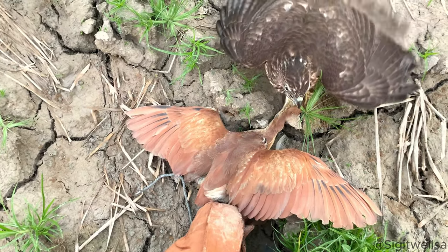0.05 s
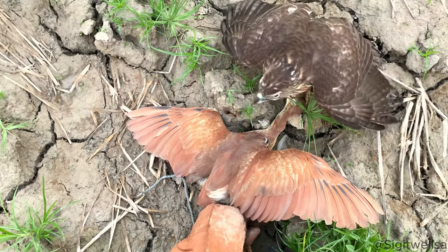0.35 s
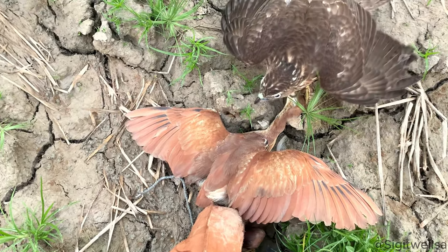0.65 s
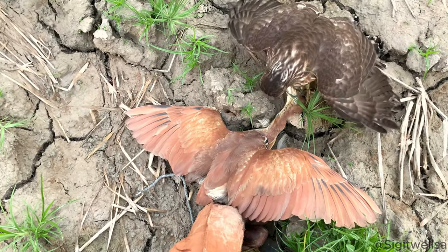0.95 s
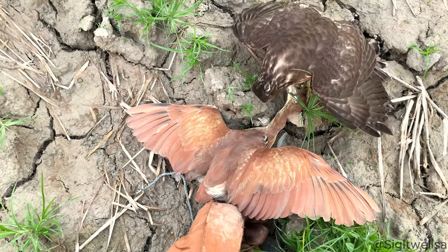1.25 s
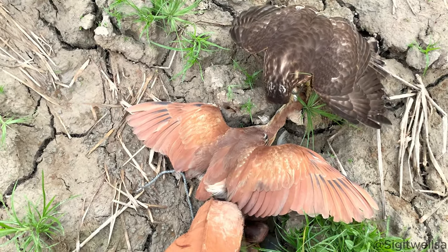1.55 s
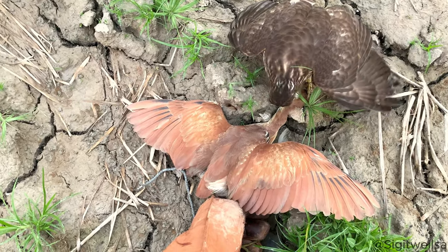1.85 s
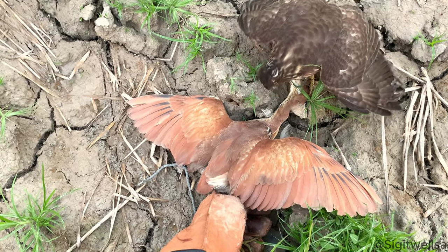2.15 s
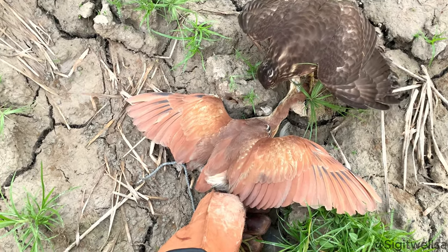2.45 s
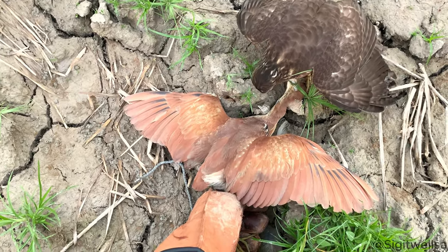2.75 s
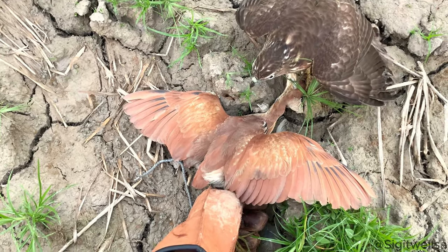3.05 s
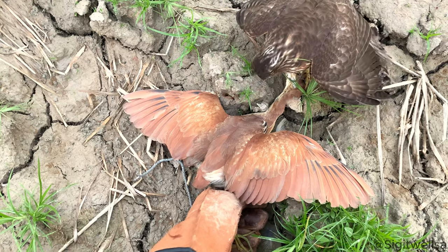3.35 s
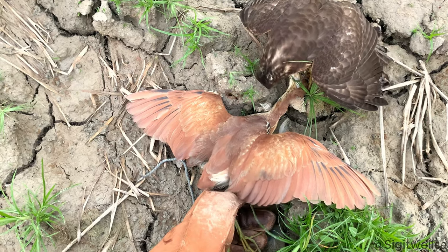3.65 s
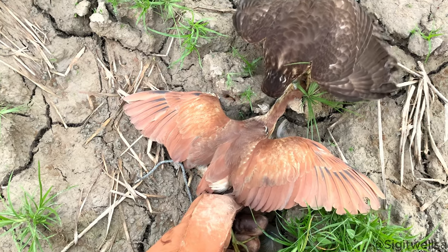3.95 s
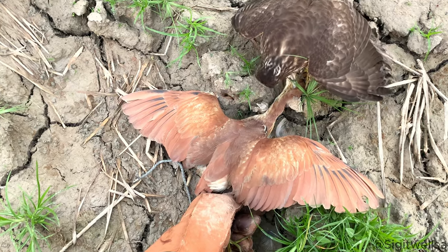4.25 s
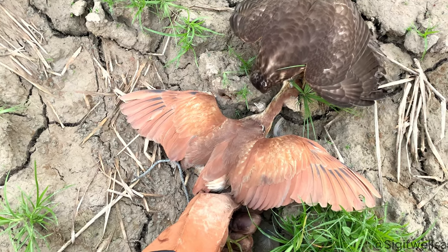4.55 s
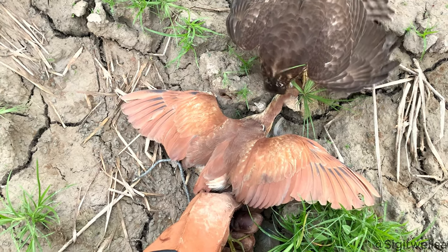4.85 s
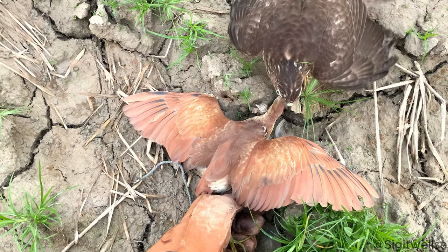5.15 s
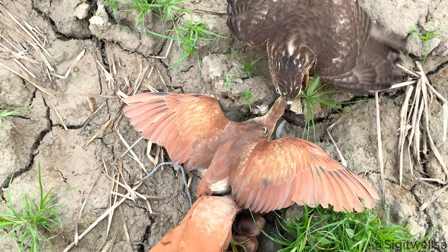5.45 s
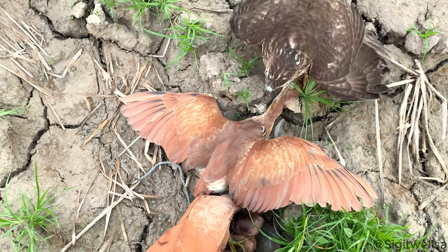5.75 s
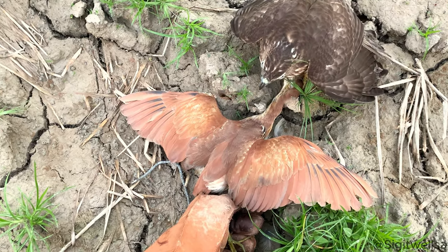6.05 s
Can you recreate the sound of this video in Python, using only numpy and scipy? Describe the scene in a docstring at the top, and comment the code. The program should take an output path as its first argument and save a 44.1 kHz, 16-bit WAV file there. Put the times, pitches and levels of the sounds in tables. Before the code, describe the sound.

A small heron gives five harsh, hoarse, high squawks at close range over a low outdoor rumble.

```python
"""Low outdoor rumble, hiss and the camera's own faint buzz, on dry open ground. Almost at once a small
heron, pinned by a hawk close to the camera's microphone, gives the first of five squawks.
Its syrinx sings a high arched tone, hoarse with turbulent air, that drops away as the tension goes;
in three of the squawks the voice breaks into a rasp. Dry straw snaps now and then, and in the second
half come faint far chips, perhaps of an insect."""
import sys
import numpy as np
from scipy import signal
from scipy.fft import rfft, irfft, next_fast_len
from scipy.io import wavfile

SR = 44100
rng = np.random.default_rng(int(sys.argv[2]) if len(sys.argv) > 2 else 0)


def log_audio(samples):
    """Write samples as a 16-bit WAV file to the path given in sys.argv[1]."""
    # one column per channel
    frames = np.atleast_2d(samples).T
    # limit to full scale, then quantise
    limited = np.clip(frames, -1, 1)
    pcm = np.round(limited * 32767).astype(np.int16)
    wavfile.write(sys.argv[1], SR, pcm)


N = 272979
TIME = np.arange(N) / SR
BAND_LIMIT_HZ = 15750

# rumble of the open ground: f/Hz, relative level/dB
RUMBLE_SPECTRUM = [(12, -49), (20, -16), (40, -6), (65, -1.5), (118, -3.5), (183, -13), (239, -22.5),
                   (340, -17), (460, -33.5), (526, -34), (761, -39), (1100, -42.5), (1430, -63.5),
                   (2420, -120)]
# likeness of the rumble on left and right: f/Hz, correlation (-1 to 1)
RUMBLE_LIKENESS = [(30, .98), (130, .98), (230, .75), (380, .1), (600, -.5), (1100, -.6)]
# steady hiss: f/Hz, relative level/dB
HISS_SPECTRUM = [(300, -26.5), (1100, -4.5), (2500, 0), (4700, 0), (7000, 1), (7900, 13), (8700, -3),
                 (10000, -3), (12000, 3), (13400, 3), (15800, -15)]
# resonances of the lens motor: f/Hz, width/Hz, relative level/dB
MOTOR_MODES = [(1431.4, 120, 5), (1675, 170, 3)]
# what the camera housing passes: f/Hz, relative level/dB
HOUSING_SPECTRUM = [(900, -20), (1250, 0), (1850, 0), (2200, -20)]
# the heron's calls: t/s, length/s, crest f/Hz, held f/Hz (both at full tension), settles after/s,
# level/dB, overtone fade/(dB/s), then as offsets: fundamental/dB, its change once settled/dB,
# octave/dB, high overtones/dB, hoarseness/dB; last, beak resonance start f/Hz, end f/Hz
SQUAWK_CALLS = [(0.203, 0.307, 1700, 1471, 0.076, -21.5, -30, -0.5, -17, 1.5, 6, -3.5, 5300, 3400),
                (1.089, 0.292, 1616, 1550, 0.090, -26.5, 0, -4.5, 3, -1.5, 2.5, -5, 5400, 3650),
                (3.524, 0.312, 1566, 1534, 0.097, -27.5, -5, -2, 0, -4, 5, -2, 5200, 3600),
                (4.387, 0.292, 1620, 1547, 0.079, -26.5, -5, -3, 1, -5.5, 2.5, -5.5, 5300, 3500),
                (5.982, 0.308, 1646, 1449, 0.079, -19, -50, -8, -15, -3, 5, -7, 4850, 3850)]
# fixed resonances of the windpipe: f/Hz, half-width/Hz, boost/dB
WINDPIPE_MODES = [(3240, 100, 8), (6250, 170, 5.5)]
# colour of the fourth partial and above: f/Hz, relative level/dB
OVERTONE_SPECTRUM = [(4000, 13), (5200, -4), (6300, -7.5), (7900, -4.5), (9300, -10.5), (11000, -12),
                     (12600, -3), (14200, -13), (16000, -22)]
# last squeak of the third partial as a squawk dies: t/s, level/dB, half-length/s
END_SQUEAKS = [(0.497, -20, .008), (1.366, -17.5, .009), (3.813, -23.5, .011), (4.661, -23, .008)]
# turbulent air through throat and beak: f/Hz, relative level/dB
BREATH_SPECTRUM = [(300, -32.5), (650, -31), (1050, -41.5), (1550, -1.5), (1950, -21), (2650, -23),
                   (3100, 6.5), (3700, 3), (4700, 11.5), (5400, 3), (7300, 1.5), (8800, -1), (11300, 0.5),
                   (13500, -3.5), (15800, -13.5)]
# breaks in the voice: start t/s, end t/s, level/dB, throat resonance start f/Hz, end f/Hz, pitch jump/Hz
VOICE_BREAKS = [(0.319, 0.357, -28, 3250, 3177, 1.5), (0.372, 0.378, -17.5, 3200, 3177, 44),
                (.383, 0.449, -16.5, 3426, 3146, 148.5), (0.449, .486, -23, 3200, 3000, -2),
                (3.634, 3.640, -22, 3550, 3490, 75), (3.67, 3.678, -27, 3567, 3434, 44.5),
                (3.717, 3.772, -21, 3750, 3700, 89), (4.565, 4.608, -19, 3800, 3793, 72.5)]
# spitting noise in a rasp: f/Hz, relative level/dB
SPIT_SPECTRUM = [(300, -27), (650, -18), (1050, -24.5), (1700, 4.5), (2300, 7.5), (4500, -3.5),
                 (6500, -12.5), (15000, -23.5)]
# decay of the echoes from ground and plants: f/Hz, time to fall 60 dB/s
ECHO_DECAY = [(500, .5), (3000, .2), (5000, .22), (8000, .45), (14000, .7)]
# small snaps of dry straw: t/s, peak level/dB
STRAW_SNAPS = [(0.5746, -44), (3.353, -47), (3.3864, -52), (3.8832, -44.5), (3.9418, -45), (3.956, -45.5)]
# resonances of a dry stalk: f/Hz, half-width/Hz, relative level/dB
STALK_MODES = [(2955, 520, 2.5), (3790, 2400, -7), (5330, 330, -28)]
# chips in the distance: t/s, peak level/dB, f/Hz
FAR_CHIPS = [(4.766, -66.5, 7300), (4.781, -64, 5870), (4.914, -60.5, 5860), (4.941, -65.5, 7400),
             (5.018, -68, 5900), (5.17, -65.5, 7350), (5.59, -58, 7430), (5.852, -66, 7400)]
# the recorder's stereo processing: f/Hz, phase lead of the left channel over the right/rad
STEREO_PHASE = [(0, 0), (1550, 0.8), (2100, -0.13), (2800, 4.33), (3300, 0.64), (3750, 1.14), (4400, 2.64),
                (4800, 3.2), (5600, 4.58), (6700, 6.21), (8850, 9.42), (11000, 12.53), (13200, 15.72),
                (15000, 18.84)]


def amp(db):
    """Decibels to gain."""
    return 10 ** (np.asarray(db) / 20)


def unit(x):
    """Scales to rms 1."""
    return x / np.sqrt(np.mean(x ** 2) + 1e-20)


def read(points, hz):
    """Reads a table on a log-frequency axis."""
    f, value = np.transpose(points)
    return np.interp(np.log(hz + 1), np.log(f + 1), value)


def add(mix, s, sound):
    """Mixes a sound in at time s."""
    part = mix[max(round(s * SR), 0):][:len(sound)]
    part += sound[:len(part)]


def colour(x, points):
    """Filters by a spectrum table; rms 1."""
    return unit(irfft(rfft(x) * amp(read(points, np.fft.rfftfreq(len(x), 1 / SR))), len(x)))


def wobble(size, hz):
    """Up to a second of random motion, rolling off above hz; rms about 1."""
    f = np.fft.rfftfreq(SR, 1 / SR)
    return unit(irfft(rfft(rng.standard_normal(SR)) / (1 + (f / hz) ** 4), SR))[:size]


def resonate(x, hz, width):
    """A resonance of gain 1 at its centre."""
    turn = np.exp(2j * np.pi * np.cumsum(np.full(len(x), hz)) / SR)
    pole = np.exp(-np.pi * width / SR)
    return 2 * (turn * signal.lfilter([1 - pole], [1, -pole], x / turn + 1e-18)).real


def ring(x, modes):
    """Resonances side by side, each applied twice for a narrower, steeper peak."""
    return sum(amp(db) * resonate(resonate(x, hz, width), hz, width) for hz, width, db in modes)


def bell(hz, centre_hz, half_width):
    """A resonance curve: 1 at its centre, 0.5 at one half-width off."""
    return 1 / (1 + ((hz - centre_hz) / half_width) ** 2)


def gate(t, start, end, edge=.0015):
    """1 between start and end, with short ramps."""
    return np.clip((t - start) / edge + .5, 0, 1) * np.clip((end - t) / edge + .5, 0, 1)


def outdoor_rumble(mid_db=-57.5, gust_db=.5):
    """Low rumble that swells a little with the air; its bass is alike on both sides."""
    hz = np.fft.rfftfreq(N, 1 / SR)
    likeness = read(RUMBLE_LIKENESS, hz)
    mid, side = rfft(rng.standard_normal((2, N))) * amp(read(RUMBLE_SPECTRUM, hz))
    side = side * np.sqrt((1 - likeness) / (1 + likeness))
    drift = np.interp(TIME, np.linspace(0, TIME[-1], SR), wobble(SR, 30))  # stretched over the scene
    gusts = unit(amp(gust_db * drift))
    return irfft(np.array([mid + side, mid - side]), N) * gusts * amp(mid_db) / irfft(mid, N).std()


def steady_hiss(level_db=-74):
    """A thin, even hiss under everything."""
    return amp(level_db) * colour(rng.standard_normal(N), HISS_SPECTRUM)


def lens_buzz(mid_db=-65, rate_hz=60, spread=.45, chatter_s=.004):
    """In the camera itself the lens motor is nudged, never quite on the beat, and rings at two pitches."""
    beats = np.arange(.001, TIME[-1] - .01, 1 / rate_hz)
    kick_times = abs(beats + .0005 * rng.standard_normal(len(beats)))
    kicks = np.zeros(N)
    kicks[(kick_times * SR).astype(int)] = amp(1.2 * rng.standard_normal(len(beats)))
    chatter = signal.lfilter([1], [1, -np.exp(-1 / (chatter_s * SR))], kicks)
    mid_drive = kicks + .05 * (chatter + .27) * rng.standard_normal(N)
    side_drive = (chatter + .3) * rng.standard_normal(N)
    mid, side = (colour(ring(drive, MOTOR_MODES), HOUSING_SPECTRUM) for drive in (mid_drive, side_drive))
    return amp(mid_db) * np.array([mid + spread * side, mid - spread * side])


def syrinx_tension(age, length, scoop=.34, scoop_s=.014, drop_s=.08):
    """Tension of the syrinx, 0-1: a quick scoop up, a hold, a drop at the end."""
    remaining = np.clip((length - age) / drop_s, .06, 1)
    return (1 - scoop * np.exp(-age / scoop_s)) * remaining ** .168


def syrinx(hz, gains, chaos, flutter=.009, growl=.16):
    """The syrinx sings an unsteady harmonic tone and chops the air into puffs; returns both."""
    surges = np.clip(wobble(len(hz), 150), -.4, 1.6)  # brief throbs lift pitch, tone and air together
    tremor = unit(surges - surges.mean())
    jitter = (.006 + .03 * chaos) * wobble(len(hz), 900)  # uneven cycles blur the upper partials most
    cycles = np.cumsum(hz * (1 + flutter * tremor + jitter)) / SR
    # cycles tend to group in threes, which puts wandering sidebands between the partials
    triplets = 2 * np.pi * (cycles / 3 + np.cumsum(45 * wobble(len(hz), 60)) / SR)
    flicker = .75 * tremor + .5 * wobble(len(hz), 250)
    tone = 0
    for k, gain in enumerate(gains, 1):
        unrest = min(k / 3, 2)
        shimmer = unit(amp(unrest * (flicker + .6 * wobble(len(hz), 210))))
        sidebands = 1 + growl * unrest * np.cos(triplets + 2 * np.pi * rng.random())
        partial = np.sqrt(2) * np.sin(2 * np.pi * (k * cycles + rng.random()))
        tone = tone + gain * shimmer * sidebands * partial
    airflow = (1 + .7 * np.cos(2 * np.pi * cycles)) * amp(1.4 * flicker)
    return tone, airflow * rng.standard_normal(SR)[:len(hz)]


def squawk(start, length, crest_hz, held_hz, settle_s, level_db, fade_db_per_s, fundamental_db,
           thinning_db, octave_db, high_db, hoarse_db, beak_start_hz, beak_end_hz,
           full_break_hz=77, low_cut_hz=1470, attack_s=.009, release_s=.0021):
    """One call at close range: tension sets pitch and level, windpipe and beak colour the tone."""
    age = np.arange(0, length + .02, 1 / SR)
    t = start + age
    tension = syrinx_tension(age, length)
    slack = 1 - tension
    settled = 1 / (1 + np.exp((settle_s - age) / .018))  # the crest gives way to the held pitch
    jump = sum(gate(t, first, last, edge=.005) * jump_hz for first, last, *_, jump_hz in VOICE_BREAKS)
    chaos = np.minimum(jump / full_break_hz, 1)
    hz = (crest_hz + (held_hz - crest_hz) * settled + jump) * tension
    effort_db = level_db - 52 * slack
    partials = np.arange(1, 15)[:, None] * hz
    beak_hz = np.interp(age, [0, length], [beak_start_hz, beak_end_hz])  # sinks as the beak closes
    partial_db = 10 * bell(partials, beak_hz, half_width=263)
    partial_db += sum(db * bell(partials, f, half_width) for f, half_width, db in WINDPIPE_MODES)
    low_cut_db = 58 * np.minimum(np.log2(hz / low_cut_hz), 0)  # so small a throat hardly radiates lows
    partial_db[0] += fundamental_db + thinning_db * settled + low_cut_db
    partial_db[1] += octave_db + 19 * slack  # a slack syrinx favours the octave
    partial_db[1:] += fade_db_per_s * age
    partial_db[3:] += high_db - 34 * age + read(OVERTONE_SPECTRUM, partials[3:])  # the call grows duller
    gains = amp(effort_db - 8 * chaos + partial_db) * (partials < BAND_LIMIT_HZ)
    squeak = sum(amp(db) * np.exp(-((t - s) / half) ** 2) for s, db, half in END_SQUEAKS)
    gains[2] = np.maximum(gains[2], squeak)
    tone, puffs = syrinx(hz, gains, chaos)
    # the call grows hoarser, but a slack syrinx passes less air
    air = amp(effort_db + hoarse_db + 18 * age - 16.5 * slack) * colour(puffs, BREATH_SPECTRUM)
    envelope = np.minimum(age / attack_s, 1) * np.exp(-np.maximum(age - length, 0) / release_s)
    return start, (tone + air) * envelope


def ground_echoes(x, level_db=-27, echoes_per_s=3000):
    """Weak scattered echoes from the ground and plants, different on each side."""
    taps = rng.choice([-1., 1.], (2, SR)) * (rng.random((2, SR)) < echoes_per_s / SR)
    hz, t, spectrum = signal.stft(taps, SR, nperseg=256)
    decay = amp(-60 * t / read(ECHO_DECAY, hz)[:, None])
    early_lift = 1 + 5 * np.exp(-t / .014)
    tail = signal.istft(spectrum * decay * early_lift, SR, nperseg=256)[1]
    return amp(level_db) * signal.fftconvolve(x[None], tail / np.linalg.norm(tail[0]), axes=1)[:, :N]


def rasp(start, end, db, first_hz, last_hz, burst_hz=290, swerve=.037, spit_db=-17):
    """The voice breaks: irregular bursts of a few milliseconds swell and collapse in the throat."""
    t = np.arange(start - .002, end + .002, 1 / SR)
    size = len(t)
    bursts = np.cumsum(burst_hz * np.exp(.27 * wobble(size, 200))) / SR
    swell = abs(np.sin(np.pi * bursts)) ** .8
    hz = np.interp(t, [start, end], [first_hz, last_hz]) * (1 + swerve * wobble(size, 530))
    slip = rng.normal(0, .18, 200)[bursts.astype(int) % 200]  # each burst starts a little out of step
    throat = unit(swell * np.sin(2 * np.pi * (np.cumsum(hz) / SR + slip)))
    spit = colour(swell * rng.standard_normal(size), SPIT_SPECTRUM)
    return t[0], amp(db) * (throat + amp(spit_db) * spit) * gate(t, start, end)


def straw_snaps(decay_s=.0037):
    """Each snap is a brief crackle that rings a dry stalk."""
    out, t = np.zeros(N), np.arange(1200) / SR
    modes = [(hz, 2 * half_width, db) for hz, half_width, db in STALK_MODES]
    for s, db in STRAW_SNAPS:
        snap = ring(rng.standard_normal(len(t)) * np.exp(-t / decay_s), modes)
        add(out, s - .001, amp(db) * snap / abs(snap).max())
    return out


def far_chips(length_s=.012):
    """Short pure pips from far off, perhaps an insect."""
    out, t = np.zeros(N), np.arange(0, length_s, 1 / SR)
    for s, db, hz in FAR_CHIPS:
        add(out, s - length_s / 2, amp(db) * np.hanning(len(t)) * np.sin(2 * np.pi * hz * t))
    return out


def stereo_processing(x):
    """The recorder shifts the left channel's phase ahead of the right, widening the calls and hiss."""
    size = next_fast_len(N + SR)
    lead = np.interp(np.fft.rfftfreq(size, 1 / SR), *np.transpose(STEREO_PHASE))
    return irfft(rfft(x, size) * np.exp(.5j * np.array([lead, -lead])), size)[:, :N]


def scene():
    """The heron close in front of the microphone, with quiet open ground all round."""
    heron = np.zeros(N)
    for call in SQUAWK_CALLS:
        add(heron, *squawk(*call))
    for *burst, _ in VOICE_BREAKS:
        add(heron, *rasp(*burst))
    widened = stereo_processing(steady_hiss() + heron + straw_snaps() + far_chips())
    return widened + ground_echoes(heron) + outdoor_rumble() + lens_buzz()


def record(dry, ceiling=.9):
    """The recorder clips any peak over its ceiling, then cuts the top of the treble."""
    clipped = np.clip(dry, -ceiling, ceiling)
    lowpass = signal.firwin(511, BAND_LIMIT_HZ, window=("kaiser", 9), fs=SR)
    return signal.oaconvolve(clipped, lowpass[None], "same")


dry = scene()
out = record(dry)
log_audio(out)
```